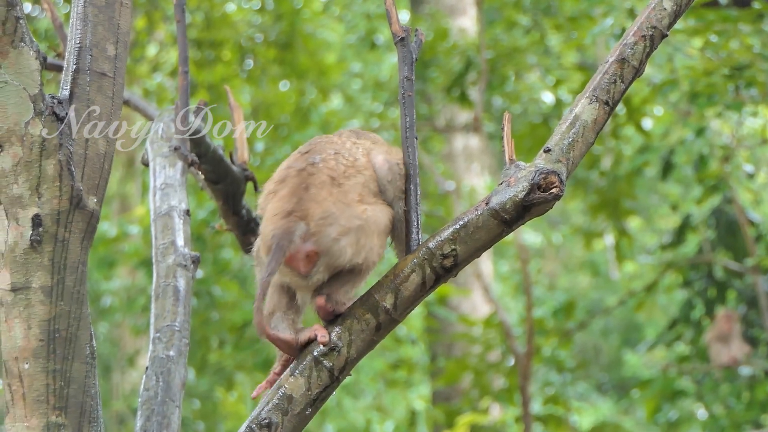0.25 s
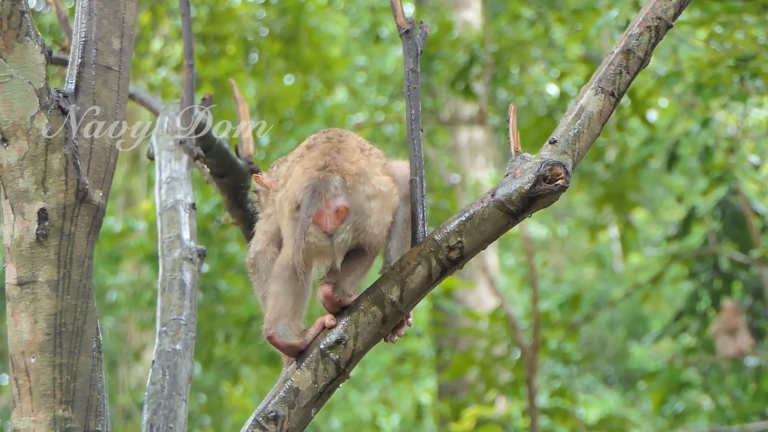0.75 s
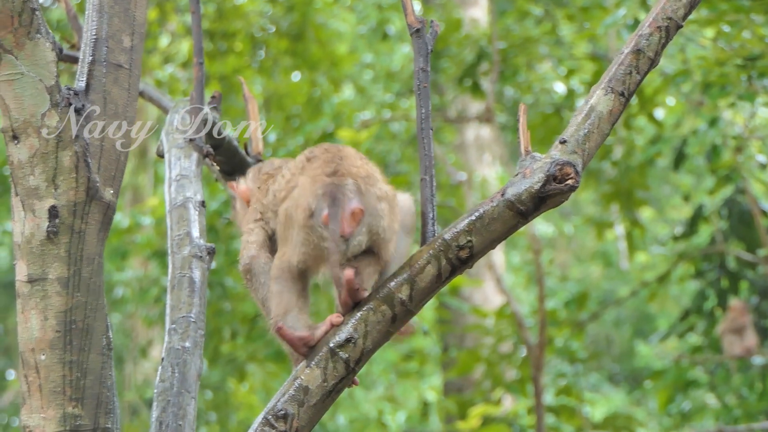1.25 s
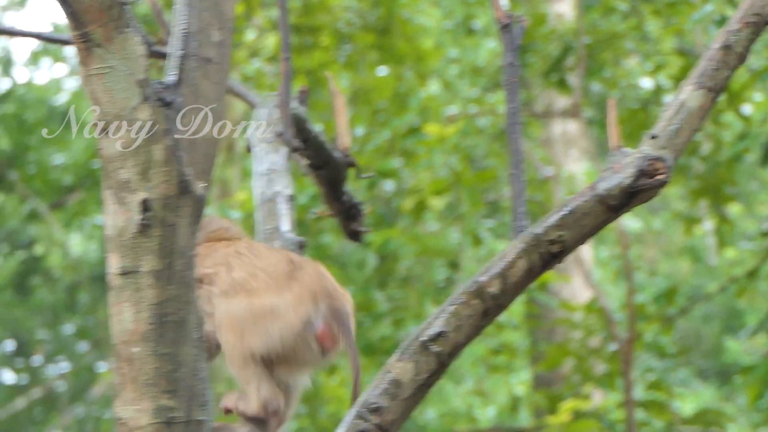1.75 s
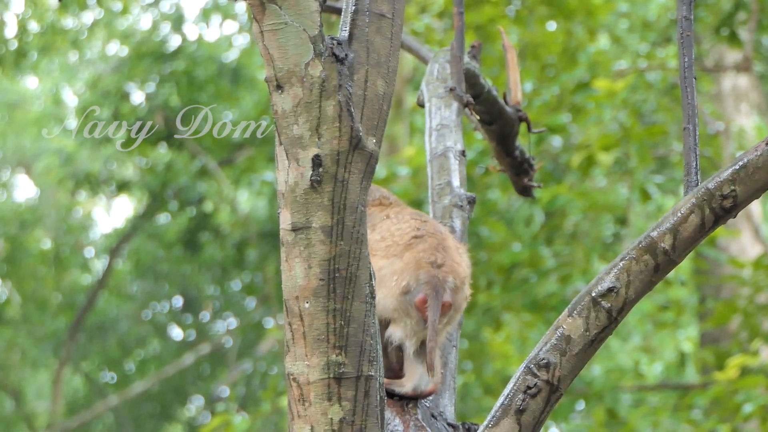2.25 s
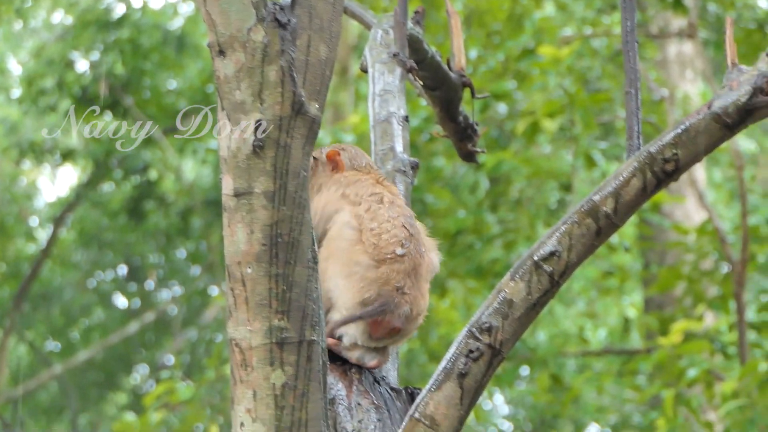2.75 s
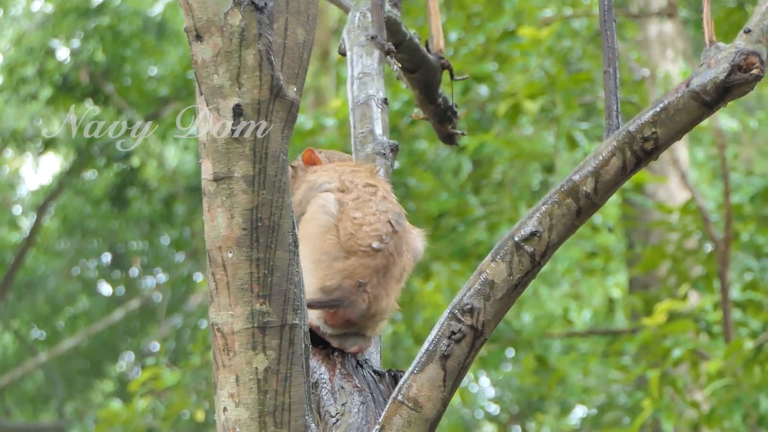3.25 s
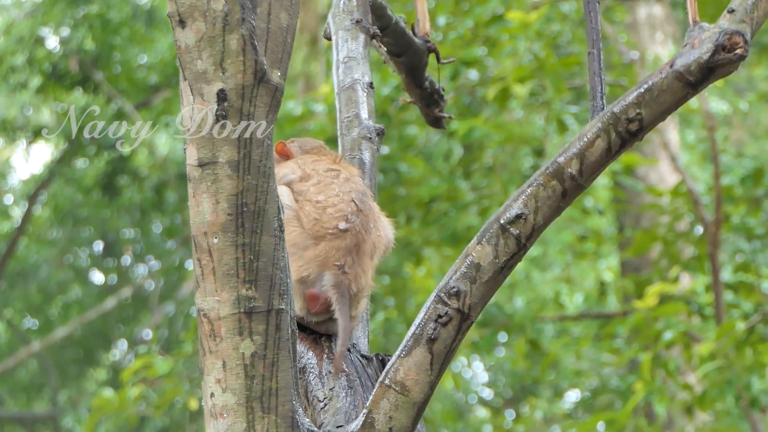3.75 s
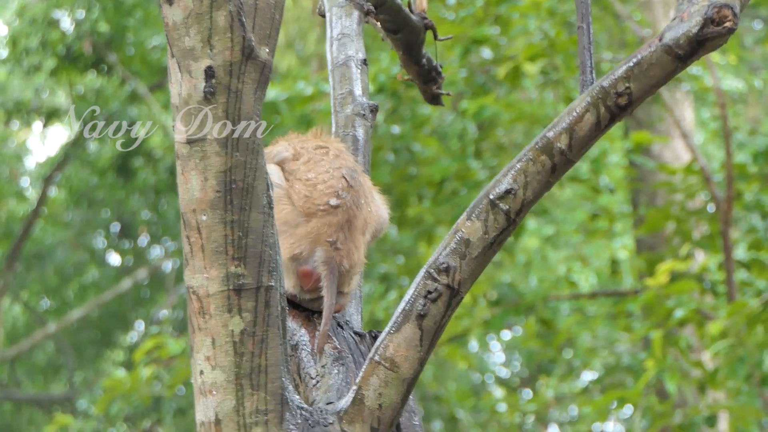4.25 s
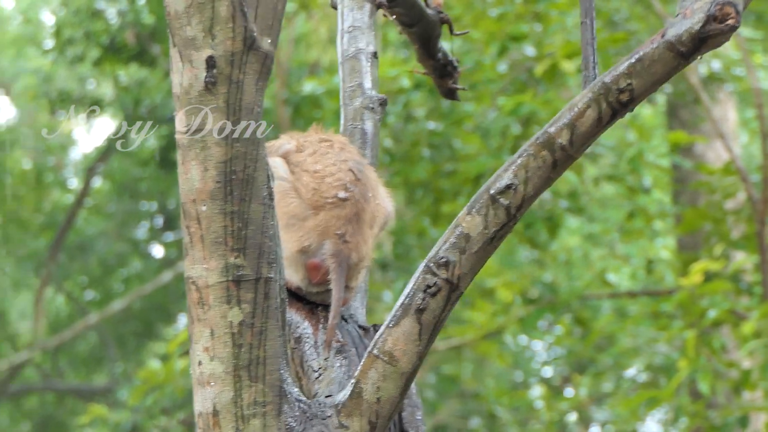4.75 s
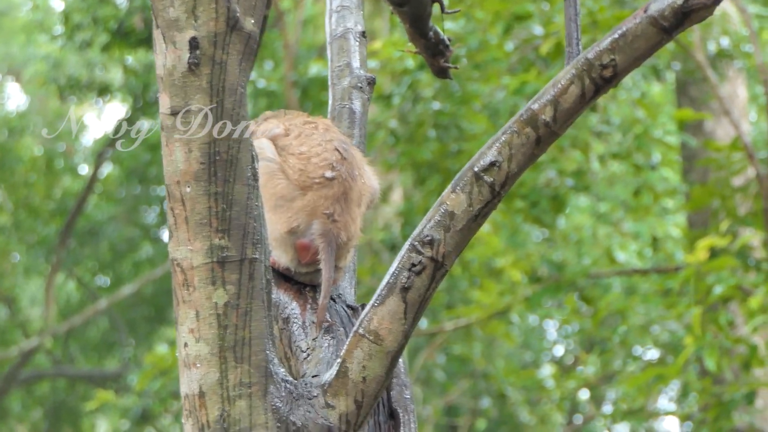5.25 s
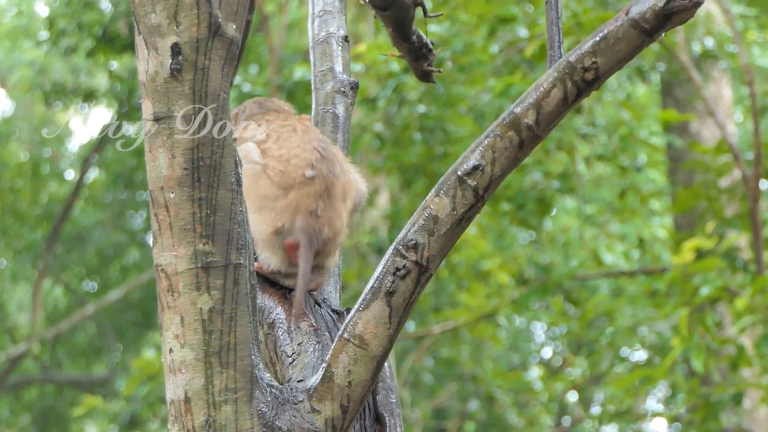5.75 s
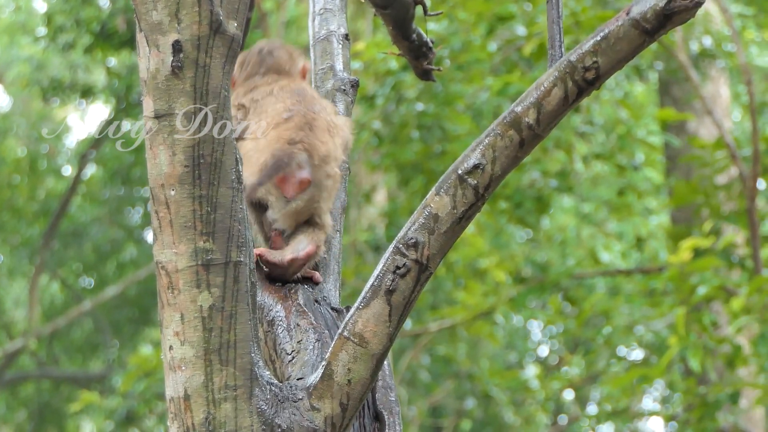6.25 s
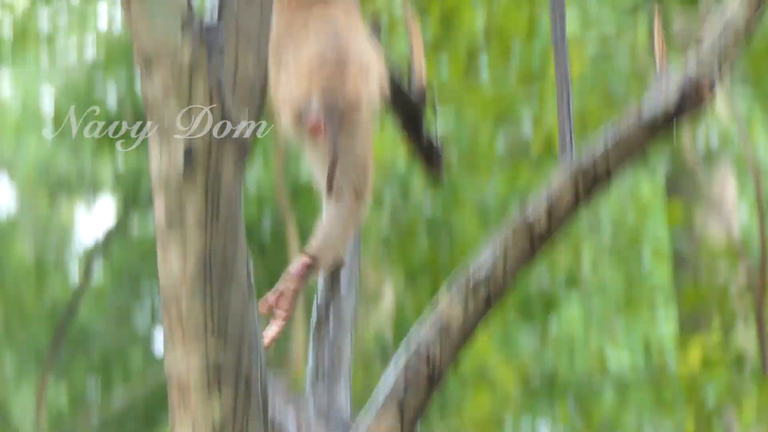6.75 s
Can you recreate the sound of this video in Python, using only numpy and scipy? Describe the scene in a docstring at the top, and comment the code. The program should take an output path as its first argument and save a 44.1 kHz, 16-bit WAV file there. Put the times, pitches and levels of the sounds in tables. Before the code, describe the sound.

About seven seconds of steady rain in a forest, heard in stereo from beneath a taut fabric cover, probably an umbrella. Throughout, a wide, soft hiss of countless drops on leaves and ground flickers slightly, with fine taps on the fabric and small bright ticks on nearby leaves. From about 0.46 to 0.8 seconds a tight cluster of heavy drips strikes close overhead, each a short dry thump and hollow pock with a crisp splash. Then it is sparse, with faint hits near 1.2 and a firmer one at 1.8. From 2.5 seconds drips come more often; the loudest lands at about 2.85, another strong one at 3.7. Irregular strikes continue, with a group around 5.25 to 5.9 and more from 6.2 to 6.9. Each dies almost at once, with a very faint ground echo. The rain never stops.

```python
"""Steady rain in a forest, about seven seconds, heard from under a taut rain cover, most likely an umbrella.
From start to end, countless drops hiss and patter on the leaves, small drops tap the fabric and leaves tick.
From about half a second, heavy drips from the canopy hit close overhead, in a first cluster, then sparsely.
From about 2.5 seconds they come more often, up to the end. Each is a thump and a pock from the ringing fabric
and a short splash of shaped noise; a faint echo from the ground follows."""
import sys
import numpy as np
from scipy import signal
from scipy.fft import rfft, irfft, next_fast_len
from scipy.io import wavfile

SR = 44100
rng = np.random.default_rng(int(sys.argv[2]) if len(sys.argv) > 2 else 0)


def to_wav(sig):
    """Store sig (one row per channel, or 1-D mono) as 16-bit WAV at the path in sys.argv[1].

    Samples outside -1..1 are clipped; the rate is SR.
    """
    pcm = np.clip(np.atleast_2d(sig), -1, 1) * 32767
    pcm = np.round(pcm).astype(np.int16)
    wavfile.write(sys.argv[1], SR, pcm.T)  # frames by channels


N = 308240

HIT_SIZE = 4096  # samples kept for each short sound
AGE = np.arange(HIT_SIZE) / SR  # seconds since the impact
# usual pitches of a drop, and how far pock and spray scatter from spot to spot (share of the pitch)
POCK_HZ, SPRAY_HZ, CRACK_HZ, PITCH_SCATTER = 823, 5990, 2590, 0.022

# The heavy drips on the fabric. A drop that bursts gives more splash than thump; a taut spot gives more pock.
# Each row: start in seconds, strength in dB, splash over thump in dB, pock over strength in dB,
# pitch of the crack in Hz.
HEAVY_DRIPS = [(0.4649, -29, -7, 8.5, 2970), (0.5056, -37, 7, 5.5, 2600), (0.5729, -35, 1, 8, 1980),
               (0.6735, -35.5, 7.5, 0.5, 2420), (0.685, -34, -5, 6.5, 2900), (0.7432, -51, 18, 1, 3570),
               (0.773, -41, 1, 6, 2600), (1.2108, -51, 21, 6, 2600), (1.267, -51.5, 16, 7, 1760),
               (1.8123, -33, -4, 6, 2980), (1.8393, -53.5, 6, 17.5, 1700), (1.898, -53.5, -4, 13.5, 2700),
               (2.512, -47.5, 6, 7.5, 2960), (2.6911, -46.5, 12, 3, 3000), (2.8416, -26.5, 2, 3.5, 2680),
               (2.9608, -44, 3, 5.5, 3130), (2.982, -44.5, -6, -12, 2130), (3.0088, -48, 12, 10.5, 2130),
               (3.0478, -39, -2, 4, 2620), (3.2913, -37, -6.5, 7, 2650), (3.352, -45.5, 4, 6.5, 2300),
               (3.408, -49.5, 15, 5, 2550), (3.4164, -46.5, 1, 2.5, 2650), (3.5112, -40, -3, -1, 2600),
               (3.547, -47.5, 13, 5.5, 2680), (3.7021, -32, 2, 1, 2570), (3.9323, -38, -6, -1, 2670),
               (3.9562, -52, 1, 9, 3000), (4.3926, -40, 0, -3, 2100), (4.6697, -35, -6.5, 1.5, 2850),
               (4.802, -46, -1, 3.5, 2830), (5.1351, -56, 17, 11, 2070), (5.2496, -34.5, 4.5, 6, 2530),
               (5.4544, -34, 2, 2, 2250), (5.4977, -33, 0.5, 7.5, 2110), (5.5754, -36, 1, 5, 1930),
               (5.8017, -43.5, 7.5, 2.5, 3140), (5.8593, -31, 1.5, -0.5, 2860),
               (6.1799, -37.5, -4.5, 1, 2860), (6.4105, -48.5, -6, 10.5, 1800), (6.4335, -42, 7, 9, 2310),
               (6.6056, -32.5, -3.5, 7.5, 2000), (6.6253, -45, 3, 7, 2800), (6.699, -30.5, 3.5, 1, 2830),
               (6.8533, -42, -5, 7, 2550), (6.866, -39, -1.5, 9.5, 2530)]


def umbrella(small_count=240, small_db=-63.5, spread_db=4.0, splash_db=8, taut_db=6):
    """Heavy drips and a random patter of small drops, few large and many faint; the ground throws them back."""
    out = np.zeros((2, N))
    for start_s, *drop in HEAVY_DRIPS:
        add(out, start_s, drip(*drop))
    for when, size, hardness, spot in rng.random((small_count, 4)):
        strength_db = small_db + spread_db * min(-np.log(size), 3)
        crack_hz = CRACK_HZ * 2 ** ((spot - .5) / 2)  # up to a quarter octave either way
        add(out, when * N / SR, drip(strength_db, splash_db * hardness, taut_db, crack_hz))
    echo_delay = int(0.0093 * SR)
    echo = np.pad(out, ((0, 0), (echo_delay, 0)))[:, :N]
    return out + undb(-26.5) * echo


# Ways the whole wet panel rings.
# Each row: usual pitch in Hz, time to die away by 60 dB in seconds, relative level in dB.
PANEL_MODES = [(218, 0.026, -8.5), (309, 0.017, 4.5), (438, 0.003, -9)]
# Ways the patch under the drop rings.
# Each row: multiple of the pock pitch, time to die away by 60 dB in seconds, relative level in dB.
PATCH_MODES = [(.76, 0.0024, -6), (1, 0.0083, 6.5), (1.55, 0.0048, -6.5)]
# Colour of the fabric's after-ring. Each row: frequency in Hz, relative level in dB per Hz.
FLUTTER_COLOUR = [(70, -18), (170, 8.5), (350, 0), (600, 1.5), (850, -4.5), (1300, -2.5), (2200, -11),
                  (5000, -28)]
# Colour of the impact. Each row: multiple of the crack pitch, relative level in dB.
CRACK_COLOUR = [(.03, -54), (.28, -31.5), (.55, -2.5), (.74, -12), (1, 3), (1.25, -0.5), (1.6, -11),
                (2.1, -13.5), (5, -36)]
# Colour of the flying droplets. Each row: multiple of the spray pitch, relative level in dB.
SPRAY_COLOUR = [(.02, -54), (.48, -24.5), (.74, -2), (.93, 1), (1.12, -3.5), (1.35, -9), (1.6, -4.5),
                (1.95, -19.5), (2.7, -42)]
# Colour of a struck leaf, also used where the ears differ in a drip.
# Each row: multiple of the pitch, relative level in dB.
LEAF_COLOUR = [(.25, -12), (.65, -0.5), (1, 13.5), (1.3, -4), (1.8, -14), (3, -32)]


def drip(strength_db, splash_db, taut_db, crack_hz):
    """One drop on the fabric shares its strength between thump and splash; tension and direction vary by spot."""
    thump_db = strength_db - splash_db / 2
    burst_db = strength_db + splash_db / 2
    pock_db = strength_db + taut_db
    pock_hz, spray_hz = np.array([POCK_HZ, SPRAY_HZ]) * np.exp(PITCH_SCATTER * rng.standard_normal(2))

    panel_stretch = np.exp(0.11 * rng.standard_normal())
    thump = blow(ring(PANEL_MODES, panel_stretch), thump_db)
    pock = blow(ring(PATCH_MODES, pock_hz), pock_db)

    # waves run back from the ribs a moment later and blur into a faint after-ring
    returning = (1 - fade(0.0091)) * (fade(0.046) + undb(-21) * fade(0.077))
    flutter = colour(rng.standard_normal(HIT_SIZE) * returning, FLUTTER_COLOUR)
    flutter = blow(flutter, (thump_db + pock_db) / 2 - 7)

    # a shorter contact cracks higher and louder, and leaves less spray: 7 dB per octave
    snap_db = 7 * np.log2(crack_hz / CRACK_HZ)
    crack = splash(pitched(CRACK_COLOUR, crack_hz), t60=0.0026, scatter_t60=0.018, scatter_db=-13.0)
    crack = blow(crack, burst_db + 1.5 + snap_db)
    spray = splash(pitched(SPRAY_COLOUR, spray_hz), t60=0.0038, scatter_t60=0.015, scatter_db=-5)
    spray = blow(spray, burst_db - snap_db)

    # the two ears see the patch and the droplets from different angles
    patch_side = splash(pitched(LEAF_COLOUR, 1.36 * pock_hz), t60=0.012, scatter_t60=0.028, scatter_db=-12)
    droplet_side = splash(pitched(LEAF_COLOUR, 10200), t60=0.0045, scatter_t60=.02, scatter_db=-18)
    side = blow(patch_side, pock_db - 20.5) + blow(droplet_side, burst_db - 18.5)

    # the panel swings against the struck patch
    body = panned(pock, -1.2) - thump
    direction_db = -.2 + 1.7 * rng.standard_normal()
    return panned(body + flutter + crack + spray, direction_db) + np.array([side, -side])


def ring(modes, stretch):
    """Fabric modes kicked into motion, each dying away; a small sheet radiates no deep bass."""
    motion = sum(undb(db) * fade(t60) * np.cos(2 * np.pi * hz * stretch * AGE) for hz, t60, db in modes)
    return signal.sosfilt(signal.butter(2, [145, 1900], "band", fs=SR, output="sos"), motion)


def splash(points, t60, scatter_t60, scatter_db, rise_t60=0.00041):
    """The drop flattens and bursts, and its droplets scatter a little longer: a fading burst of coloured noise."""
    burst = (1 - fade(rise_t60)) * (fade(t60) + undb(scatter_db) * fade(scatter_t60))
    return colour(rng.standard_normal(HIT_SIZE) * burst, points)


# Bright ticks on the nearest leaves. Each row: start in seconds, level in dB, pitch in Hz.
LEAF_TICKS = [(0.2564, -43, 5740), (1.395, -43, 8600), (1.417, -45, 6700), (1.938, -44, 9600),
              (2.448, -37.5, 9900), (4.874, -43, 5600), (5.286, -42, 6170), (5.342, -41.5, 9800)]


def near_leaves(count=160, tick_db=-54.5, spread_db=3.0, lowest_hz=1900, highest_hz=11000):
    """Drops tick on the nearest leaves, and more softly at random on leaves of every size."""
    out = np.zeros((2, N))
    for start_s, db, hz in LEAF_TICKS:
        add(out, start_s, tick(db, hz))
    for when, size, leaf in rng.random((count, 3)):
        hz = lowest_hz * (highest_hz / lowest_hz) ** leaf
        db = tick_db + spread_db * min(-np.log(size), 3)
        add(out, when * N / SR, tick(db, hz))
    return out


def tick(db, hz):
    """A drop slaps a leaf somewhere to the left or right: a short noise burst around the leaf's pitch."""
    slap = splash(pitched(LEAF_COLOUR, hz), t60=0.009, scatter_t60=0.028, scatter_db=3)
    return panned(blow(slap, db), 2.4 * rng.standard_normal())


# Colour of the rain in the forest. Each row: frequency in Hz, relative level in dB per Hz.
FOREST_COLOUR = [(25, -35), (45, -24), (95, -11.5), (270, -4), (520, -4), (830, -0.5), (1200, -4),
                 (2100, -4), (2900, -1), (5500, -4), (8000, -10), (9700, -7.5), (12500, -19.5),
                 (16000, -43)]
# How unlike the two ears are. Each row: frequency in Hz, side minus middle in dB.
EAR_DIFFERENCE = [(30, 0), (100, -14.5), (700, -14), (1300, -10), (2400, -13.5), (4500, -17.5), (8000, -15),
                  (15000, 4.5)]


def forest(rain_db=-45.5):
    """Steady rain on leaves and ground all around: a shared middle plus a separate side signal for width."""
    mid = level(colour(patter(), FOREST_COLOUR), 0)
    side = colour(level(colour(patter(), FOREST_COLOUR), 0), EAR_DIFFERENCE)
    return np.array([mid + side, mid - side]) * undb(rain_db)


def patter(drops_per_s=2000, spread_db=2.0, wash_db=-2.5, flicker_db=1.37):
    """Thousands of far drops, as random clicks, over a smooth wash; each octave flickers a little on its own."""
    hits = rng.random(N) < drops_per_s / SR
    signs = rng.choice([-1, 1], N)
    sizes = undb(spread_db * np.minimum(rng.exponential(size=N), 5))
    drops = level(hits * signs * sizes, 0)
    spectrum = rfft(drops + undb(wash_db) * rng.standard_normal(N))
    octave = np.log2(np.maximum(np.fft.rfftfreq(N, 1 / SR), 1))
    out = np.zeros(N)
    for center in range(4, 16):
        # overlapping bands, each fading out one octave away
        band = irfft(spectrum * np.maximum(1 - abs(octave - center), 0), N)
        out += band * undb(flicker_db * walk(22))
    return out


def walk(rate):
    """Random drift joining `rate` random points a second by straight lines."""
    knots = rng.standard_normal(int(N / SR * rate) + 2)
    return np.interp(np.arange(N) / SR * rate, np.arange(len(knots)), knots)


def undb(db):
    """Decibels to gain."""
    return 10 ** (np.asarray(db) / 20)


def fade(t60):
    """Exponential decay from the moment of impact, 60 dB down after t60 seconds."""
    return np.exp(-np.log(1000) * AGE / t60)


def pitched(shape, hz):
    """Place a colour given in multiples at a pitch."""
    return [(multiple * hz, db) for multiple, db in shape]


def gain_at(hz, points):
    """Gain of a table of Hz and dB, read on a log-frequency axis."""
    f, db = np.transpose(points)
    return undb(np.interp(np.log(np.maximum(hz, 1)), np.log(f), db))


def colour(x, points):
    """Causal (minimum-phase) filter with the given spectrum, so that attacks stay sharp."""
    size = next_fast_len(len(x) + HIT_SIZE)
    cepstrum = irfft(np.log(gain_at(np.fft.rfftfreq(size, 1 / SR), points)), size)
    # fold the cepstrum onto positive time, so nothing sounds before the attack
    cepstrum[1:size // 2] *= 2
    cepstrum[size // 2:] = 0
    response = np.exp(rfft(cepstrum))
    return irfft(rfft(x, size) * response, size)[:len(x)]


def level(x, db):
    """Set the rms of a lasting sound."""
    return x * undb(db) / np.sqrt(np.mean(x ** 2))


def blow(x, db):
    """Set the rms of a short sound, with its whole energy counted over 10 ms."""
    return x * undb(db) / np.sqrt(np.sum(x ** 2) / (.01 * SR))


def panned(x, pan_db):
    """Two channels, left louder by pan_db."""
    return x * undb(np.array([[pan_db], [-pan_db]]) / 2)


def add(out, start_s, sound):
    """Mix a short stereo sound in at a time in seconds."""
    start = max(int(start_s * SR), 0)
    out[:, start:start + HIT_SIZE] += sound[:, :max(N - start, 0)]


def scene():
    """Fabric overhead, near leaves, far forest."""
    return umbrella() + near_leaves() + forest()


def record(dry):
    """The recorder cuts the top above 15.6 kHz."""
    return signal.sosfilt(signal.ellip(8, .2, 70, 15600, fs=SR, output="sos"), dry)


dry = scene()
out = record(dry)
to_wav(out)
```